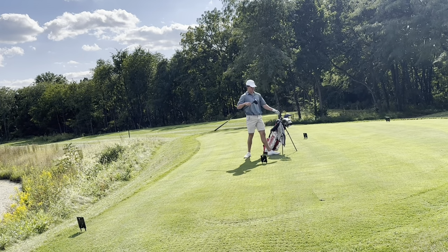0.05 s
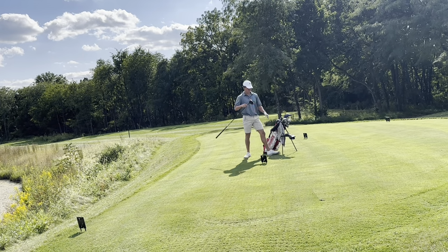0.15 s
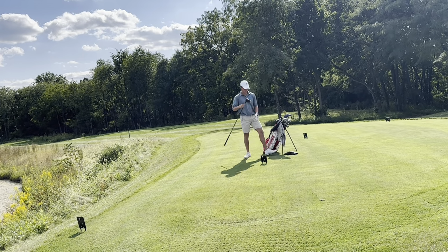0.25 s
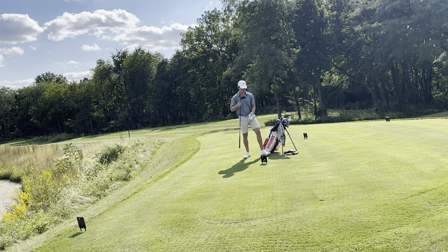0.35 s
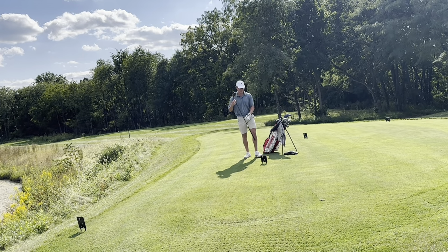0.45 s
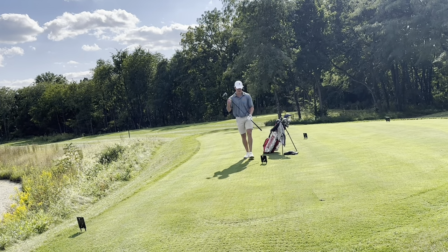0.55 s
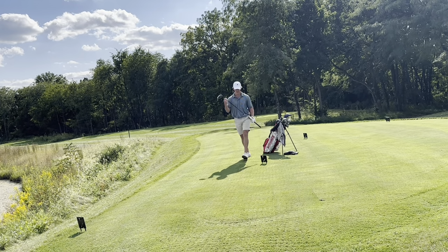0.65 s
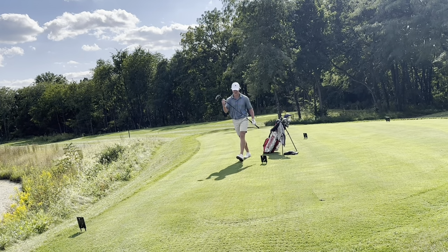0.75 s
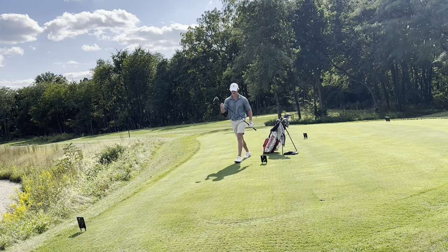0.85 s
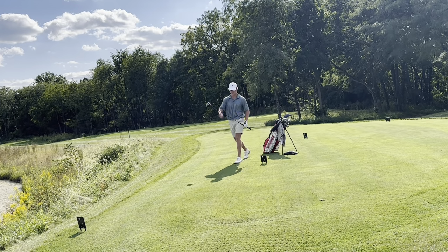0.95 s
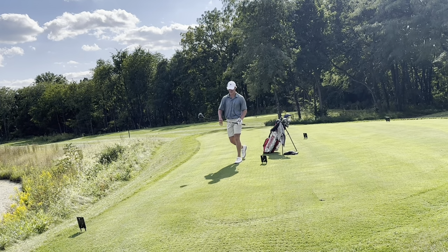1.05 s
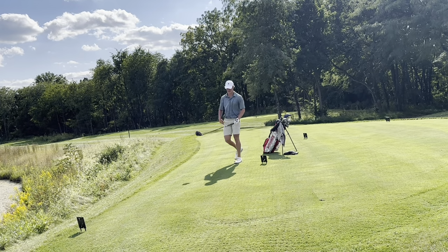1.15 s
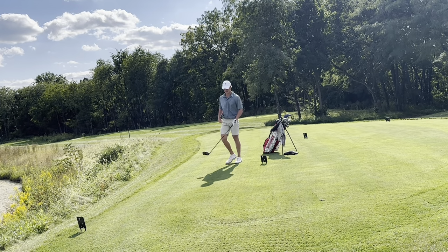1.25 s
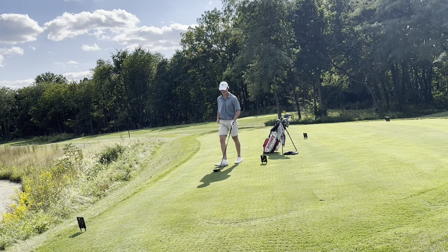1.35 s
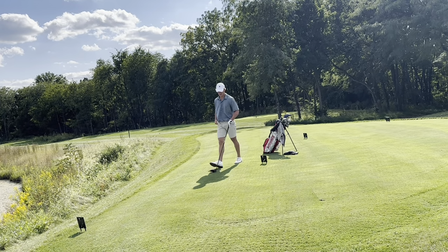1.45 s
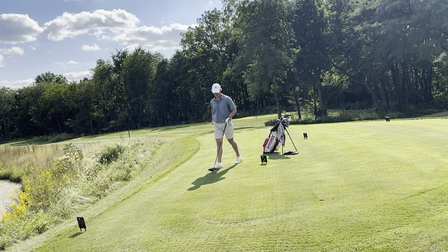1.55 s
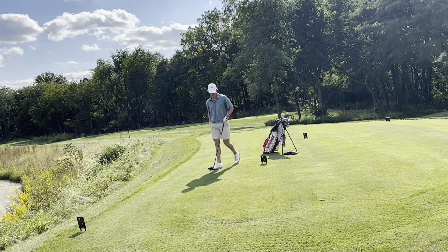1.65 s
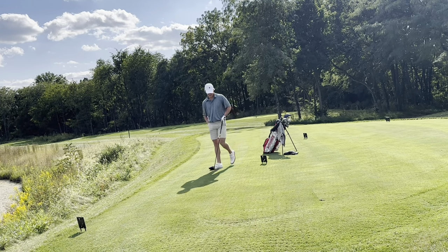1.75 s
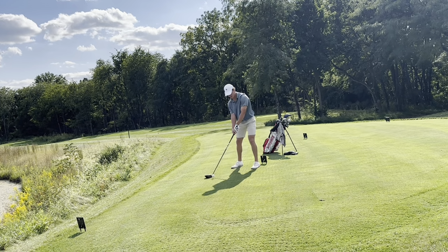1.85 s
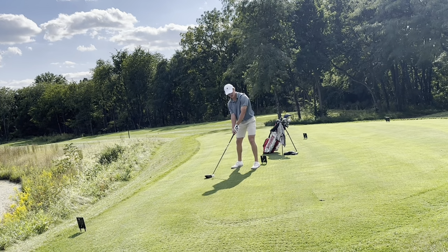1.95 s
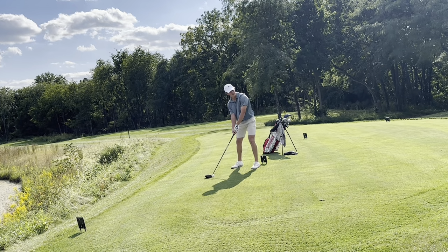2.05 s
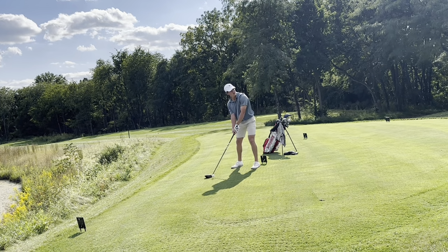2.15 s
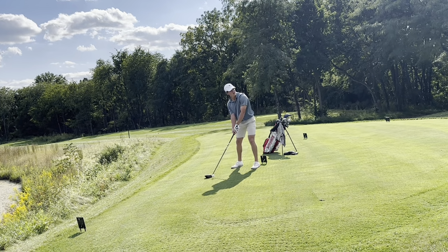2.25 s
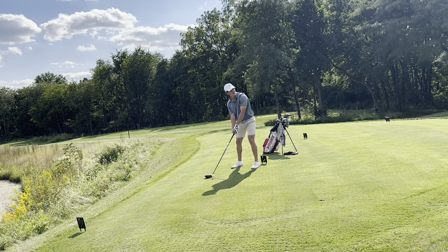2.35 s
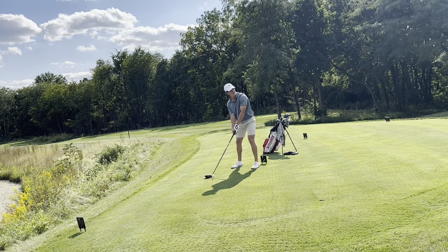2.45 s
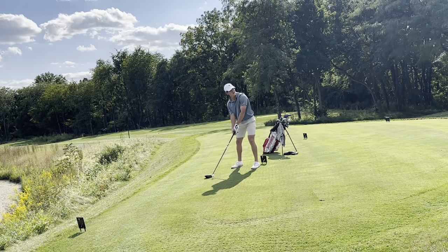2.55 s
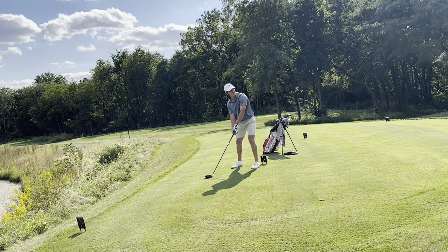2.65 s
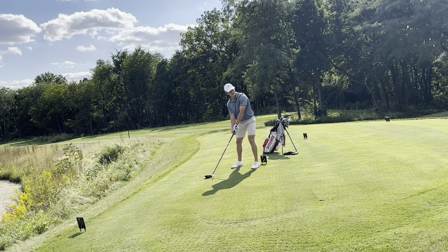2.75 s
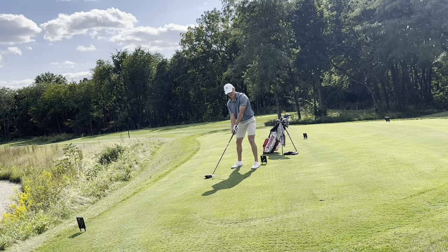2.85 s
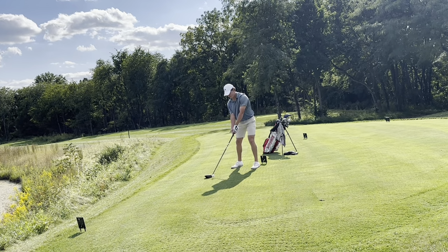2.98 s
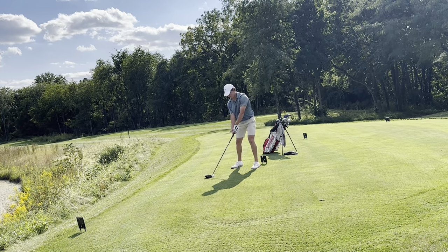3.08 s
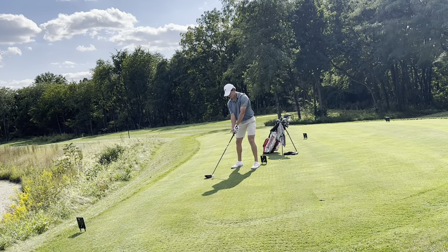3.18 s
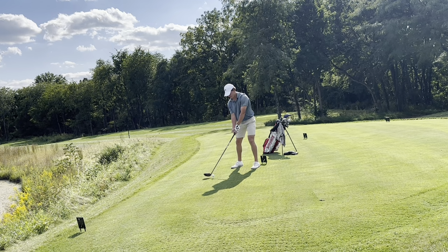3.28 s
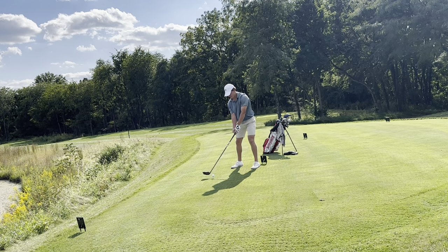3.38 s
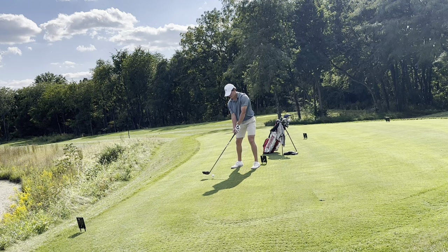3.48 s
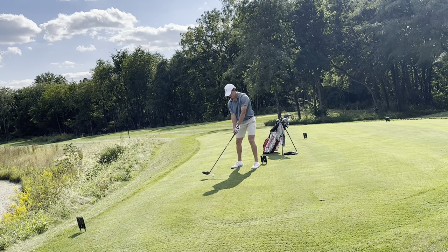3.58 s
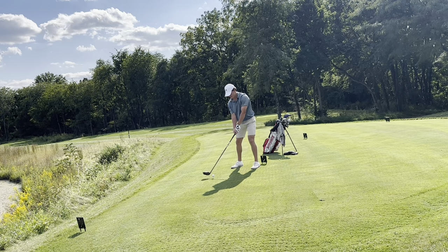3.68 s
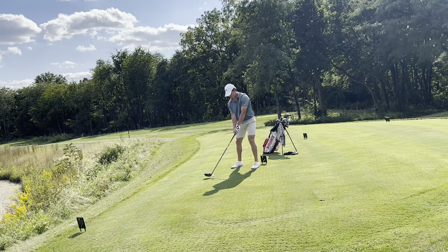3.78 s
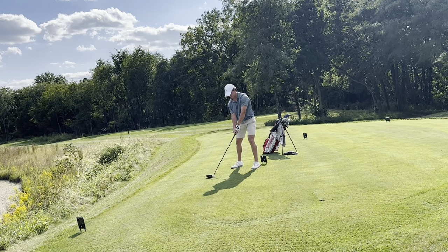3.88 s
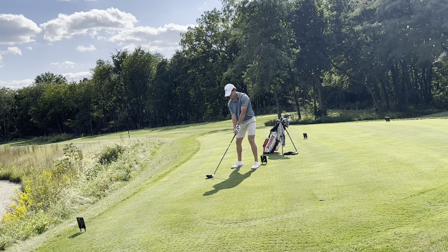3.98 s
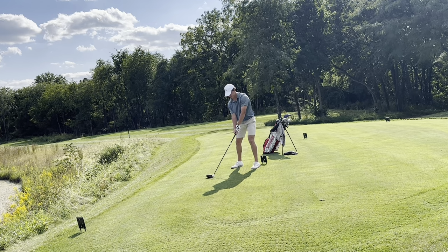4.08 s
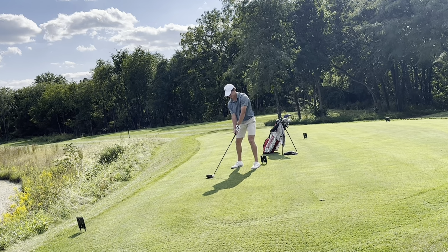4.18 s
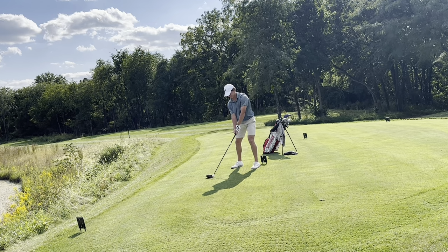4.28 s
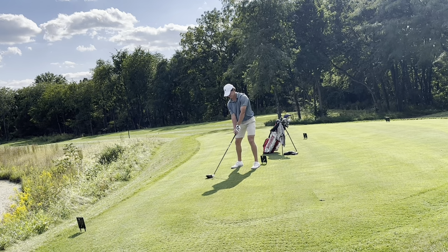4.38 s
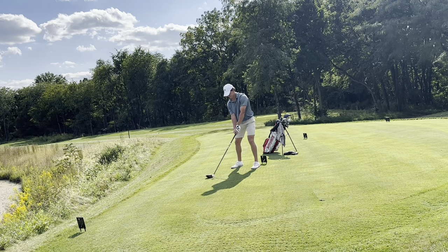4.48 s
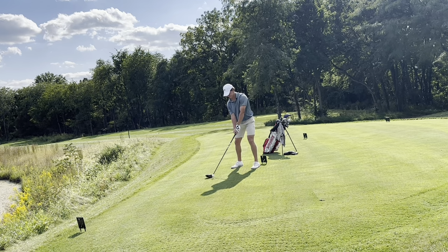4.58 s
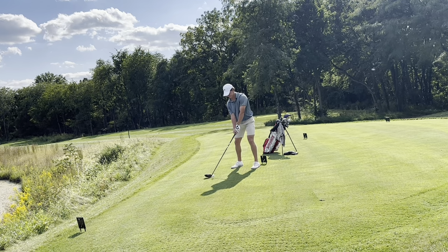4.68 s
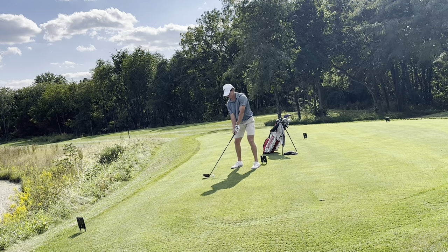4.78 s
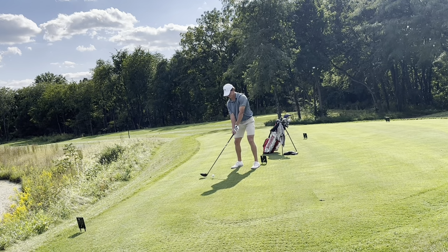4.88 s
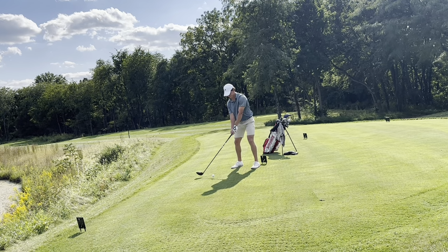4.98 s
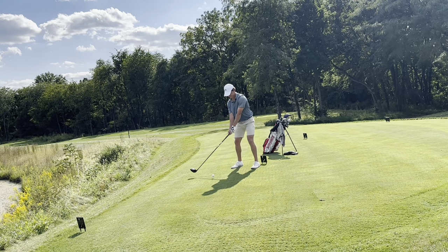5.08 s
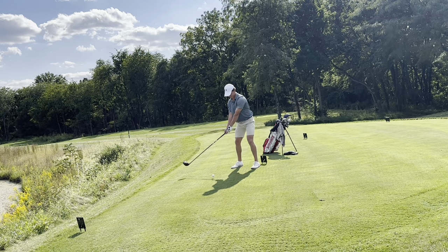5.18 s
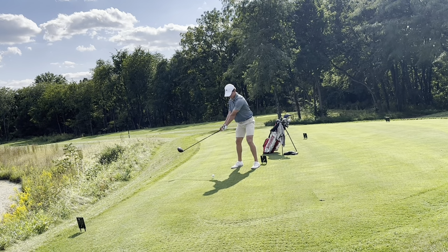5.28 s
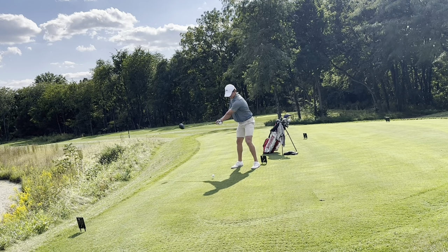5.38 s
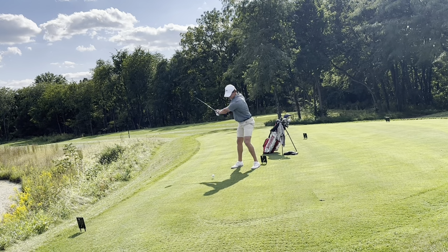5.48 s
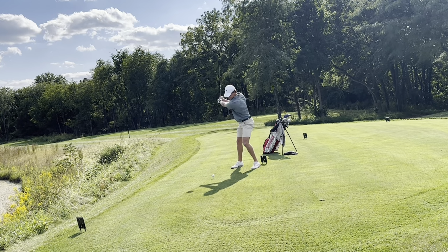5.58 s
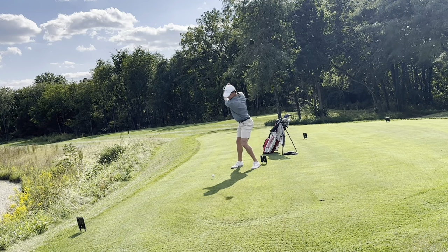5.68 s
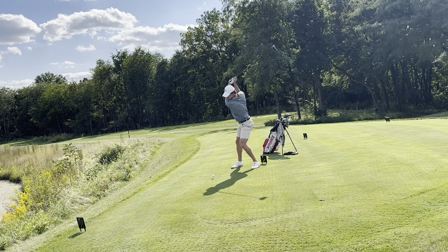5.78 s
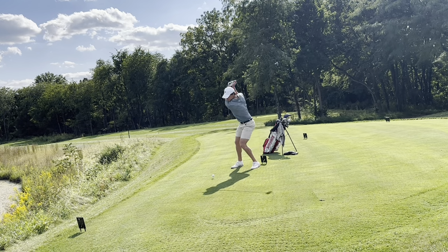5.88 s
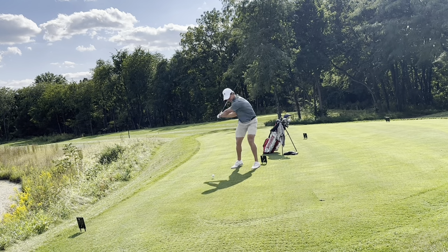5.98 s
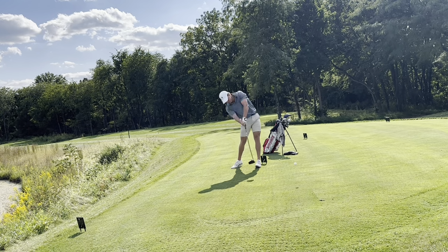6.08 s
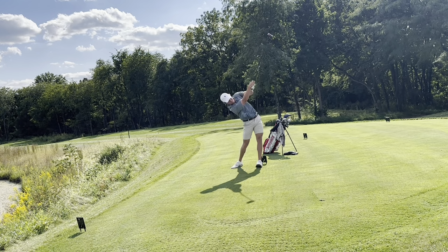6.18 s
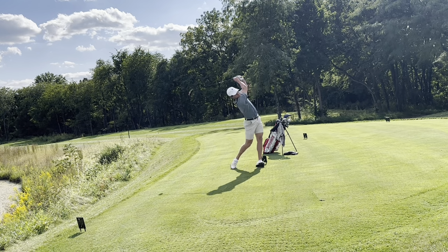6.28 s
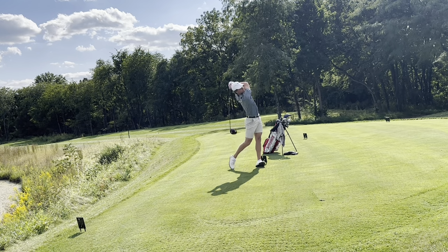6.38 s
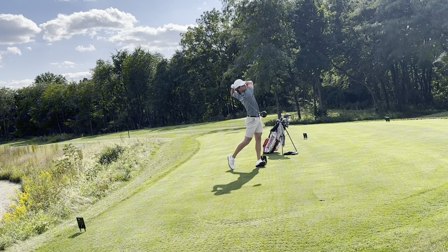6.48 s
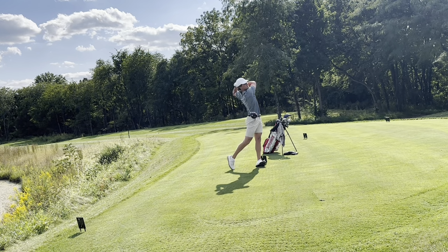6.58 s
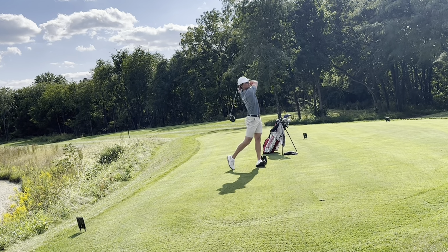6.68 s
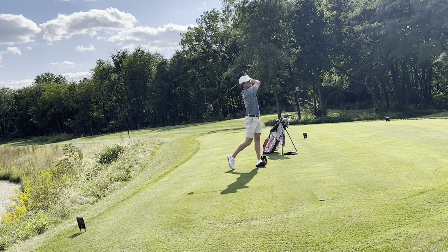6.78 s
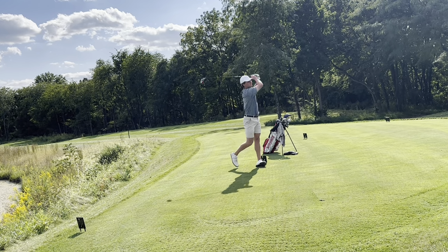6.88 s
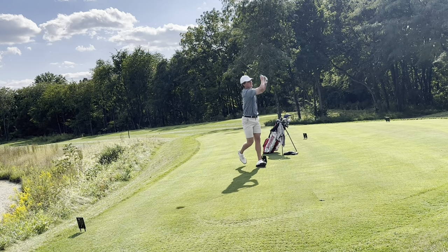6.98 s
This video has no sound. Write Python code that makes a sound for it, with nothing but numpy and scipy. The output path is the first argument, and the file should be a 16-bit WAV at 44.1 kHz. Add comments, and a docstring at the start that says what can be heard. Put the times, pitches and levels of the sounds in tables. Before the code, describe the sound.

A golf club swishes and hits a ball with one sharp crack, over faint crickets and light wind on the microphone.

```python
"""Tee shot beside a wood

A golfer drives a ball on a late-summer day. Ahead of the microphone the shaft swishes, the face cracks,
the hollow head rings as it swings away and the trees send back a soft echo. Crickets sing with their
wings in the rough and across the meadow; wind and the holding hand rumble on the microphone."""
import sys
import numpy as np
from scipy import signal
from scipy.fft import rfft, irfft, next_fast_len
from scipy.io import wavfile
from scipy.ndimage import uniform_filter1d

SR = 44100
rng = np.random.default_rng(int(sys.argv[2]) if len(sys.argv) > 2 else 0)


def store_pcm(level_fs):
    """Save levels as 16-bit WAV."""
    pcm = np.round(np.clip(level_fs, -1, 1) * 32767).astype(np.int16)
    wavfile.write(sys.argv[1], SR, np.atleast_2d(pcm).T)


N = 310023
T = np.arange(N) / SR
HZ = np.maximum(np.arange(N // 2 + 1) * SR / N, 1)
APART = np.array([[1], [-1]])   # side signal: added on the left, subtracted on the right
IMPACT_S, CUTOFF_HZ = 6.08358, 16400


def from_db(db):
    """Decibels to gain."""
    return 10 ** (np.asarray(db) / 20)


def rms_one(x):
    """Scale to unit power."""
    return x / np.sqrt(np.mean(x ** 2) + 1e-20)


def in_time(rows):
    """The columns of a curve at every sample."""
    s, *columns = np.transpose(rows)
    return [np.interp(T, s, c) for c in columns]


def colour(points):
    """Gain at every frequency from (Hz, dB) points."""
    hz, db = np.transpose(points)
    return from_db(np.interp(np.log(HZ), np.log(hz), db))


def noise(gain):
    """White noise shaped by a gain at every frequency."""
    size = next_fast_len(N)
    spectrum = rfft(rng.standard_normal(size))
    return irfft(spectrum * np.interp(np.arange(len(spectrum)) * SR / size, HZ, gain), size)[:N]


def band(hz, width_hz):
    """Noise in one band; rms 1."""
    return rms_one(noise(1 / np.sqrt(1 + (2 * (HZ - hz) / width_hz) ** 6)))


def drift(rate_hz, size=16384):
    """Smooth random wander of spread 1."""
    hz = np.arange(size // 2 + 1) * SR / N
    slow = irfft(rfft(rng.standard_normal(size)) / (1 + (hz / rate_hz) ** 4))
    return np.interp(np.arange(N) * size / N, np.arange(size), rms_one(slow))


def gate(start, end, edge):
    """A soft window in time."""
    return np.clip((T - start) / edge, 0, 1) * np.clip((end - T) / edge, 0, 1)


def swell(s, width_s):
    """A bell-shaped rise and fall around one moment."""
    return np.exp(-np.minimum(((T - s) / width_s) ** 2, 50))


def knock(s, gain, lag_cycles, dwell_s=0.0, size=16384):
    """One pulse whose lows trail its highs: by the time of contact, and by their own cycles."""
    hz = np.maximum(np.arange(size // 2 + 1) * SR / size, 1)
    turns = lag_cycles * np.log(hz / 1000) + dwell_s * (hz - hz ** 2 / (2 * CUTOFF_HZ))
    pulse = irfft(np.interp(hz, HZ, gain) * np.exp(-2j * np.pi * turns))
    centred = np.roll(pulse, size // 2)
    return np.interp((T - s) * SR + size // 2, np.arange(size), centred, left=0, right=0)


# Far air all around, in mid and side. Each row: frequency in Hz, level in dB per Hz.
AIR_MID = [(20, -102), (60, -92.5), (150, -91.5), (300, -96.5), (600, -96.5), (1050, -108), (1800, -114),
           (2600, -116), (4500, -113), (9000, -114), (11000, -118), (15500, -119)]
AIR_SIDE = [(20, -108), (100, -104), (300, -104), (580, -93.5), (1000, -102), (1500, -120), (2600, -128),
            (7000, -116), (11000, -125), (15000, -115)]

def air():
    """Steady far-off hush of air and foliage."""
    return np.sqrt(SR / 2) * (noise(colour(AIR_MID)) + noise(colour(AIR_SIDE)) * APART)


# A thin, high insect buzz. Each row: time in seconds, level in dB.
BUZZ = [(0, -84), (1.8, -80), (2.7, -87), (3.95, -76), (5.3, -89.5), (6.7, -85), (6.95, -76.5)]
# Insects in the distance. Each row: centre in Hz, width in Hz, level in dB, diffuse share in dB.
CHORUS_BANDS = [(3900, 1000, -77.5, -13), (5515, 790, -71, -23.5), (6200, 610, -74.5, -17.5),
                (7140, 940, -72, -9), (7960, 420, -70, -9), (8750, 750, -76, -8.5)]

def chorus(swell_db=0.6, swell_hz=4):
    """Many far insects blur into narrow bands that swell and ebb, with a thin buzz above them."""
    out = from_db(in_time(BUZZ)[0]) * band(hz=12830, width_hz=4800)
    for hz, width_hz, db, diffuse_db in CHORUS_BANDS:
        voices = band(hz, width_hz) + from_db(diffuse_db) * band(hz, width_hz) * APART
        out = out + from_db(db + swell_db * drift(swell_hz)) * voices
    return out


def wing_strokes(per_s, hz, fall_hz, duty, jitter=.015, blur_hz=55):
    """Each stroke of a cricket's wing is a short tone that falls in pitch as the file slows; rms 1."""
    cycle = np.cumsum(per_s * (1 + jitter * drift(12))) / SR
    stroke = np.minimum(cycle % 1 / duty, 1)
    pitch = hz + fall_hz * (.5 - stroke) + blur_hz * drift(200)
    return rms_one(np.sin(np.pi * stroke) * np.sin(2 * np.pi * np.cumsum(pitch) / SR))


def chirps(rows, length_s, edge_s):
    """The envelope of one cricket's chirps."""
    return sum(from_db(db) * gate(s - length_s / 2, s + length_s / 2, edge_s) for s, db in rows)


# Crickets out across the meadow. Each row: pitch in Hz, level in dB.
MEADOW_CRICKETS = [(5180, -80), (5330, -78), (5420, -78.5), (5540, -77), (5630, -80), (5720, -79.5),
                   (5900, -81), (6020, -77.5), (6450, -78.5), (6860, -81.5)]

def meadow(chirps_per_s=2.8, strokes_per_s=31, pace_spread=.2):
    """The crickets chirp out of step, each at its own pitch and pace."""
    out = 0
    habits = rng.uniform(-1, 1, (len(MEADOW_CRICKETS), 3))
    for (hz, db), (pace, stroke_pace, start) in zip(MEADOW_CRICKETS, habits):
        cycle = start + np.cumsum(chirps_per_s * (1 + pace_spread * (pace + drift(1)))) / SR
        per_s = strokes_per_s * (1 + pace_spread * stroke_pace)
        strokes = wing_strokes(per_s, hz, fall_hz=130, duty=.7, jitter=.1, blur_hz=90)
        out = out + from_db(db) * rms_one(strokes * np.abs(np.sin(np.pi * cycle)))
    return out


# Far from the microphone two crickets chirp and another holds a faint, longer note.
# Each row: middle in seconds, level in dB, pitch in Hz.
FAR_CHIRPS = [(1.23, -75, 6400), (1.47, -72, 6330), (1.75, -76, 6240), (2.08, -73, 6000),
              (2.83, -66.5, 5970), (3.2, -72, 6000), (3.65, -69, 5900), (4.2, -76, 6480), (5.07, -82, 6480),
              (5.62, -77, 6560)]
FAR_NOTES = [(2.6, -77.5, 4360), (4.99, -80, 4380)]

def far_crickets(rows, length_s, edge_s, blur_hz):
    """Distance blurs the wing strokes of each chirp into a wavering tone."""
    waver = blur_hz * np.cumsum(drift(117)) / SR
    return sum(chirps([(s, db)], length_s, edge_s) * np.sqrt(2) * np.sin(2 * np.pi * (hz * T + waver))
               for s, db, hz in rows)


# Trills nearer by, in the rough. Each row: start and end in seconds, strokes per second, sounding share
# of a stroke, pitch and its fall in Hz, starting level in dB, swell in dB per second, side-to-mid in dB.
TRILLS = [(0.03, 1.7, 84, .94, 3680, 1000, -73, -3.5, 0), (-0.7, 1.9, 74, .94, 3780, 580, -77.5, -2.5, 0),
          (1.6, 7.1, 66.4, .85, 3720, 450, -76.5, 0, 1), (-0.7, 7.1, 19.7, .5, 8190, 150, -82.5, 0.5, 9.5),
          (3, 7.1, 93.3, .9, 4275, 328, -79.5, 2.5, -8.5)]

def trilling_crickets(flutter_db=1.4, fade_s=0.056):
    """Steady runs of wing strokes flutter in the moving air."""
    out = 0
    for start, end, per_s, duty, hz, fall_hz, db, db_per_s, side_db in TRILLS:
        level_db = db + db_per_s * (np.clip(T, start, end) - start) + flutter_db * drift(14)
        strokes = wing_strokes(per_s, hz, fall_hz, duty, jitter=.012, blur_hz=50)
        song = from_db(level_db) * gate(start, end, fade_s) * strokes
        # a bearing off to one side turns the phase between the microphone's ports
        turned = np.gradient(song) * SR / (2 * np.pi * hz)
        out = out + song + from_db(side_db) * turned * APART
    return out


# Two nearer crickets, centred between left and right. Each row: middle in seconds, level in dB.
LOW_CHIRPS = [(.07, -74.5), (.36, -76), (.61, -77), (.82, -73), (1.12, -76), (1.4, -77), (1.66, -76),
              (1.87, -79), (2.15, -75), (2.47, -74), (2.79, -74), (3.08, -76), (3.58, -78), (3.9, -78),
              (4.15, -74), (4.42, -74), (4.69, -77), (4.95, -74), (5.24, -76), (5.49, -78), (5.76, -73),
              (6.58, -73)]
HIGH_CHIRPS = [(.24, -70), (.62, -69.5), (.98, -72), (1.37, -67.5), (1.73, -63.5), (2.67, -73), (3.87, -73),
               (4.22, -73), (4.55, -71), (4.89, -68.5), (5.23, -66.5), (5.6, -65), (5.96, -66), (6.3, -69),
               (6.97, -72)]

def chirping_crickets():
    """Short bursts of wing strokes: one cricket slow, low and uneven, the other higher and purer."""
    low = wing_strokes(per_s=27, hz=4960, fall_hz=250, duty=.55, jitter=.08)
    high = wing_strokes(per_s=33, hz=5815, fall_hz=60, duty=.85)
    return (low * chirps(LOW_CHIRPS, length_s=0.17, edge_s=0.033)
            + high * chirps(HIGH_CHIRPS, length_s=.2, edge_s=0.042))


# Faint scuffs and ticks. Each row: time and half-length in seconds, level in dB, centre and width in Hz.
SCUFFS = [(0.277, 0.012, -68, 900, 3600), (0.68, .003, -66, 12500, 4500), (1.357, 0.0037, -67, 11500, 4000)]

def scuffs():
    """Brief puffs of friction noise."""
    return sum(from_db(db) * band(hz, width_hz) * swell(s, width_s)
               for s, width_s, db, hz, width_hz in SCUFFS)


# The holding hand, right by the microphone. Each row: time in seconds, peak in dB, upper edge in Hz.
HAND_BUMPS = [(0.274, -41.5, 400), (0.279, -44.5, 406), (0.474, -44, 306), (0.543, -41.5, 152),
              (1.36, -43, 227), (1.532, -46.5, 168), (2.209, -35.5, 187), (4.372, -36, 109.7),
              (5.877, -37.5, 121.2), (6.941, -53, 130)]

def hand_bumps(body_hz=70):
    """Dull knocks of the hand through the camera body."""
    out = np.zeros(N)
    for s, db, edge_hz in HAND_BUMPS:
        passband = 1 / (1 + (HZ / edge_hz) ** 4) / (1 + (body_hz / HZ) ** 3)
        thud = knock(s, passband, lag_cycles=1.3)
        out += from_db(db) * thud / np.abs(thud).max()
    return out


def eddies(spectrum, side_db=-13):
    """Turbulence that buffets both ports nearly alike; evened to rms 1."""
    tint = colour(spectrum)
    flow = rms_one(noise(tint)) + from_db(side_db) * rms_one(noise(tint)) * APART
    return flow / np.sqrt(uniform_filter1d(np.mean(flow ** 2, axis=0), size=1400))


# A light breeze on the microphone. Each row: time in seconds, relative level in dB.
BREEZE = [(0, -59), (.45, -48.5), (.6, -54), (.72, -68.5), (1.02, -55), (1.2, -72.5), (1.45, -54),
          (1.7, -73.5), (2.3, -55.5), (2.55, -71), (3.15, -71), (3.55, -58.5), (3.85, -62), (4.02, -76.5),
          (4.28, -65), (4.6, -60.5), (5.62, -58.5), (5.85, -51.5), (6.5, -52.5), (7.03, -50.5)]
# Gusts on top of it. Each row: peak time and length in seconds, relative peak in dB, flutter share in dB.
GUSTS = [(.01, 0.046, -41.5, -40), (0.124, 0.023, -45.5, -17), (0.338, 0.036, -45, -7.5),
         (0.424, .04, -53, -16), (0.522, 0.13, -48, -6.5), (1.44, 0.014, -46.5, -18),
         (1.82, 0.036, -51.5, -15), (2.148, 0.034, -43.5, -29), (2.221, 0.061, -40.5, -11.5),
         (3.49, 0.036, -56, -16), (3.579, 0.014, -51, -9), (3.82, 0.065, -54.5, -30),
         (4.378, 0.068, -46.5, -6), (4.46, 0.053, -51.5, -7), (4.761, 0.025, -43.5, -18),
         (4.885, .033, -50.5, -29), (4.973, 0.049, -39.5, -35), (5.734, 0.04, -49, -28),
         (5.907, 0.049, -37.5, -16), (5.971, 0.033, -37, -31), (6.082, 0.076, -46, -2.5),
         (6.246, 0.025, -38, -32), (6.4, 0.059, -47.5, -16), (6.536, 0.079, -49.5, -12),
         (6.692, 0.069, -44, -14), (6.764, 0.062, -40, -19), (6.882, 0.049, -43.5, -19),
         (6.982, 0.03, -47, 1), (7.019, 0.061, -39.5, -6.5)]
# Large and small eddies at the ports. Each row: frequency in Hz, relative level in dB.
LARGE_EDDIES = [(15, -25.5), (30, -17), (48, 5), (68, 5), (100, -5), (150, -17.5), (250, -32), (500, -53),
                (1000, -68)]
SMALL_EDDIES = [(50, -23.5), (110, 5), (160, 3.5), (240, -8), (350, -19), (700, -46), (2000, -80)]

def wind(gain_db=0.77, lump_db=3, lump_hz=11):
    """Large eddies rumble with breeze and gusts; some gusts also carry a higher flutter of small ones."""
    lumps = lump_db * np.clip(drift(lump_hz), -2, 1.5)
    breeze = from_db(in_time(BREEZE)[0] + lumps)
    gusts = [(from_db(db) ** 2 * swell(s, length / 2), flutter_db) for s, length, db, flutter_db in GUSTS]
    rumble = np.sqrt(breeze ** 2 + sum(power for power, _ in gusts))
    flutter = np.sqrt(sum(power * from_db(flutter_db) ** 2 for power, flutter_db in gusts))
    return from_db(gain_db) * (rumble * eddies(LARGE_EDDIES) + flutter * eddies(SMALL_EDDIES))


# The crack comes back from the turf, the brush and the trees beyond.
# Each row: delay and rise in seconds, level in dB, seconds to fall 60 dB.
ECHOES = [(.0004, 0.000493, -17, 0.013), (.004, .004, -35.5, 0.1), (.04, 0.036, -50.5, 0.3),
          (.138, 0.017, -50.5, 0.5), (.16, 0.042, -49, 0.18), (.2, 0.039, -61, 3)]
# The tone of those returns. Each row: frequency in Hz, relative level in dB.
ECHO_COLOUR = [(200, -13.5), (700, -2), (1300, -8.5), (2800, -3), (4000, -5), (5300, 0), (7200, -0.5),
               (8400, 2), (9600, -1), (12000, -9.5), (15500, -22.5)]

def echoes(side_db=-15, treble_hz=7500, wood_delay_s=0.14, treble_loss_db_per_s=70):
    """Blades and leaves scatter the crack into noise; returns from deep in the wood lose their treble."""
    age = T - IMPACT_S
    power = 0
    for delay, rise, db, t60 in ECHOES:
        onset = np.clip((age - delay) / rise, 0, 1)
        decay_db = 60 * np.clip(age - delay - rise, 0, 2 * t60) / t60
        power += (onset * from_db(db - decay_db)) ** 2
    tint = colour(ECHO_COLOUR)
    scatter = rms_one(noise(tint)) + from_db(side_db) * rms_one(noise(tint)) * APART
    dull = signal.sosfiltfilt(signal.butter(2, treble_hz, fs=SR, output="sos"), scatter)
    treble_gain = from_db(-treble_loss_db_per_s * np.maximum(age - wood_delay_s, 0))
    return np.sqrt(power) * (dull + (scatter - dull) * treble_gain)


# Over the tee the shaft's whistle rises into the ball and sinks in the follow-through.
# Each row: time in seconds, pitch in Hz, level in dB, roughness from 0 to 1.
SWING = [(6.016, 520, -70, 0.9), (6.033, 678, -49, .8), (6.051, 786, -48, 1), (6.061, 1090, -28, 0.4),
         (6.071, 1159, -36.5, 0.9), (6.082, 1351, -40, .95), (6.091, 851, -55, .95),
         (6.103, 827.5, -49, .95), (6.128, 762, -52.5, .95), (6.147, 568, -50.5, 0.8),
         (6.175, 421, -56, 0.88), (6.235, 402, -64.5, .9), (6.42, 297, -68, 0.95)]

def swish(waver_hz=30, rush_db=-38, hiss_db=-34.5, hiss_hz=3200, rise_db_per_s=597, fall_db_per_s=332):
    """The shaft sheds vortices: a rough whistle and a rush follow its speed; its wake hisses at the ball."""
    pitch, level_db, rough = in_time(SWING)
    carrier = np.exp(2j * np.pi * np.cumsum(pitch + waver_hz * drift(116)) / SR)
    tone = np.sqrt(2) * np.real(carrier)
    speed = pitch / pitch.max()
    travel = np.cumsum(speed) / SR
    # a narrow and a wide band of noise around the pitch, both broadening with speed
    skirt, rush = (np.real(carrier * np.interp(travel, T, drift(width_hz) + 1j * drift(width_hz)))
                   for width_hz in (300, 800))
    whistle = from_db(level_db) * (np.sqrt(1 - rough ** 2) * tone + rough * skirt)
    age = T - IMPACT_S
    wake_db = hiss_db - np.minimum(np.abs(age), .5) * np.where(age < 0, rise_db_per_s, fall_db_per_s)
    wake = from_db(wake_db) * rms_one(noise(HZ / (HZ + 600) / (1 + (HZ / hiss_hz) ** 2)))
    window = gate(SWING[0][0], SWING[-1][0], edge=0.01)
    return (whistle + from_db(rush_db) * speed ** 3 * rush + wake) * window


# The head swings round and away from the microphone. Each row: time in seconds, Doppler ratio.
DOPPLER = [(6.084, .955), (6.096, .955), (6.105, .925), (6.125, .885), (6.16, .84), (6.19, .825)]
# Its turning crown beams at the microphone. Each row: time and half-length in seconds, gain in dB.
BEAMS = [(6.0978, 0.002, 28), (6.1028, .0025, 22.5)]

def head_ring(age, flutter_db=2, flutter_hz=70):
    """The hollow head's crown and sole ring on, flaring, fluttering and sinking in pitch as it flies."""
    phase_per_hz = 2 * np.pi * np.cumsum(in_time(DOPPLER)[0]) / SR
    crown, sole = (from_db(db - 60 * age / t60) * np.sin(hz * phase_per_hz)
                   for hz, db, t60 in ((4345, -43.5, 0.14), (2440, -39.5, .22)))
    beam = 1 + sum(from_db(db) * swell(s, width_s) for s, width_s, db in BEAMS)
    shell = beam * crown + sole * from_db(flutter_db * drift(flutter_hz))
    return shell * (age > 0) * gate(0, DOPPLER[-1][0], edge=.04)


# At the tee, the crack of face on ball and the dull thud under it. Each row: frequency in Hz, gain in dB.
CRACK = [(250, -13.5), (700, 11.5), (2000, 12.5), (3500, 11), (3950, 13.5), (4550, 1), (5000, 8.5),
         (5350, 0), (5800, 8), (6400, 10), (7000, 14), (7500, 3), (7900, 5), (8500, -2), (9100, 12.5),
         (10000, 11), (10800, 14), (13200, 9), (13950, -4), (14400, 9.5), (15300, 9.5), (16000, 4)]
THUD = [(50, -16), (140, 11.5), (240, 15), (350, 16.5), (520, 8), (900, -7), (2000, -38)]
# Short-lived modes of the club face. Each row: frequency in Hz, level in dB, seconds to fall 60 dB.
FACE_MODES = [(4170, -15, .012), (6070, -17.5, .014), (6525, -23, .017), (6900, -21, .012),
              (9660, -27, .018), (10600, -29, .012), (11270, -28, .014), (12600, -32, .015),
              (13490, -34, .015)]

def strike(face_delay_s=0.00061):
    """The club meets the ball with a crack and a thud; the face clangs briefly and the head rings."""
    crack = knock(IMPACT_S, colour(CRACK), lag_cycles=0.37, dwell_s=.00065)
    thud = knock(IMPACT_S, colour(THUD), lag_cycles=1.35)
    age = np.clip(T - IMPACT_S - face_delay_s, 0, .5)
    face = sum(from_db(db - 60 * age / t60) * np.sin(2 * np.pi * hz * age) for hz, db, t60 in FACE_MODES)
    return crack + thud + face + head_ring(age)


# The tee as the microphone's two ports hear it. Each row: frequency in Hz, lead of the left in radians.
PORT_PHASE = [(1800, .05), (3000, .75), (4700, .85), (5900, .15), (7000, 1.0), (8250, 2.9), (9500, 1.0),
              (11400, 0), (13500, -.7), (14200, -1.7)]

def from_tee(x):
    """Sound from the tee reaches the two ports equally loud but out of step."""
    size = next_fast_len(N)
    spectrum = rfft(x, size)
    lead = np.interp(np.arange(spectrum.shape[-1]) * SR / size, *np.transpose(PORT_PHASE))
    return irfft(spectrum * np.exp(.5j * lead * APART), size)[:, :N]


def scene():
    """The drive, its echo and the insects lie ahead; air and wind are all around the microphone."""
    ahead = from_tee(strike() + swish() + echoes() + chorus() + meadow())
    far_chirps = far_crickets(FAR_CHIRPS, length_s=0.18, edge_s=0.069, blur_hz=70)
    far_notes = far_crickets(FAR_NOTES, length_s=.3, edge_s=.05, blur_hz=35)
    near_crickets = trilling_crickets() + chirping_crickets()
    return ahead + near_crickets + far_chirps + far_notes + air() + wind() + hand_bumps() + scuffs()


def record(dry, ceiling=.85):
    """The highest peaks are rounded and the top of the treble is cut steeply."""
    rounded = dry / (1 + (dry / ceiling) ** 6) ** (1 / 6)
    return signal.sosfiltfilt(signal.ellip(8, .05, 60, CUTOFF_HZ, fs=SR, output="sos"), rounded)


dry = scene()
out = record(dry)
store_pcm(out)
```